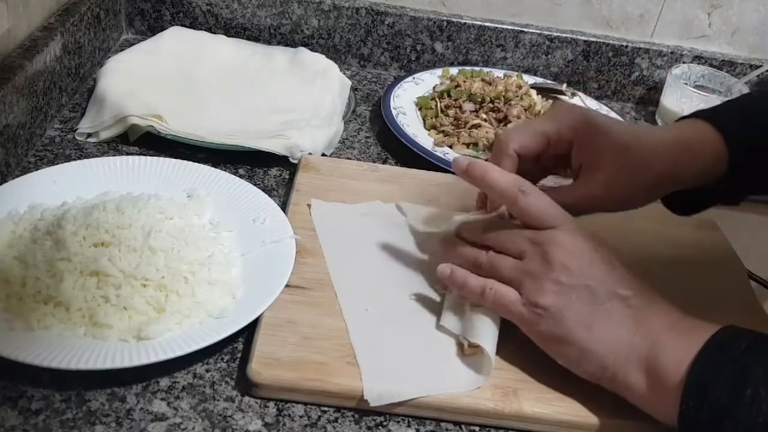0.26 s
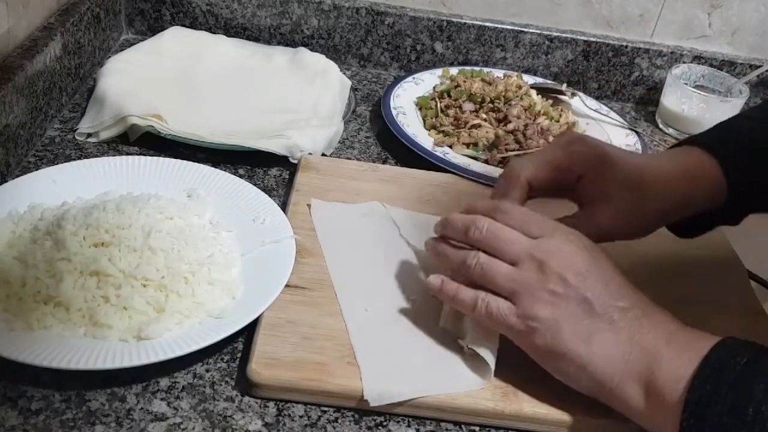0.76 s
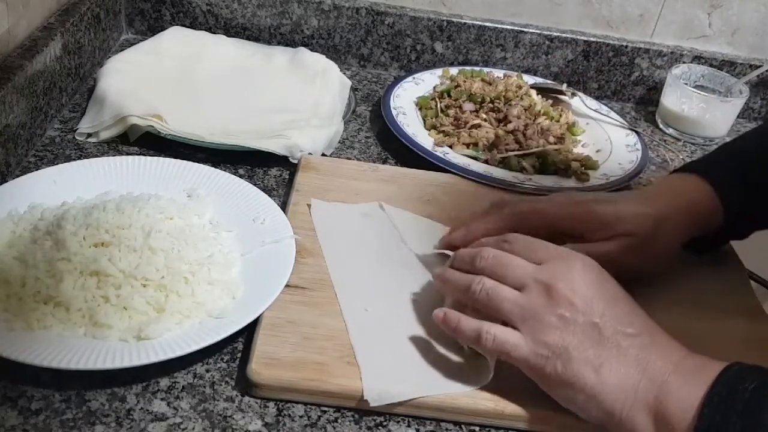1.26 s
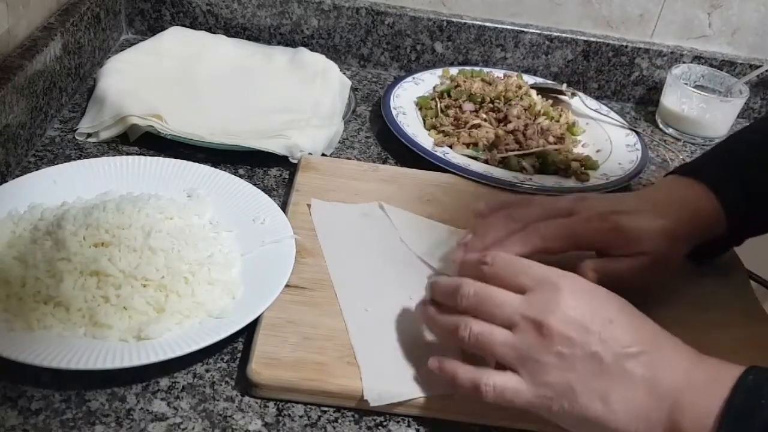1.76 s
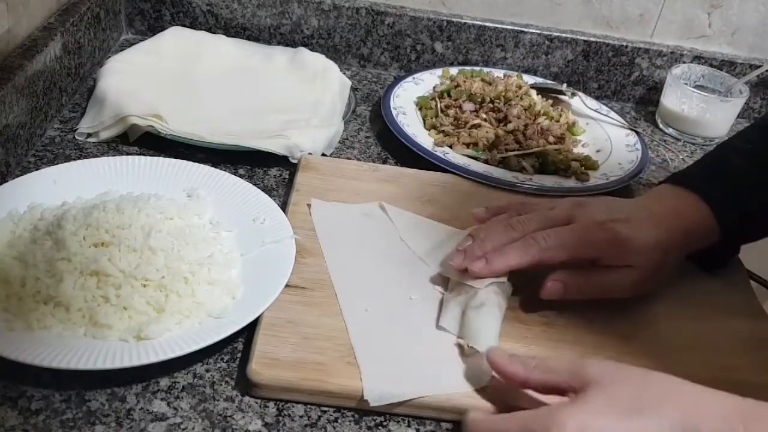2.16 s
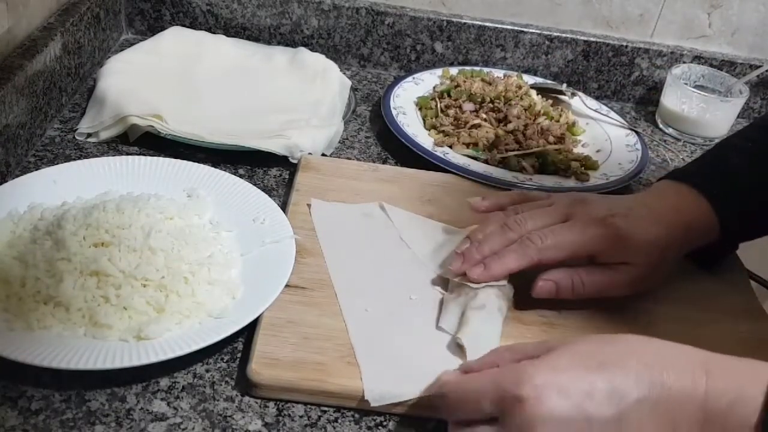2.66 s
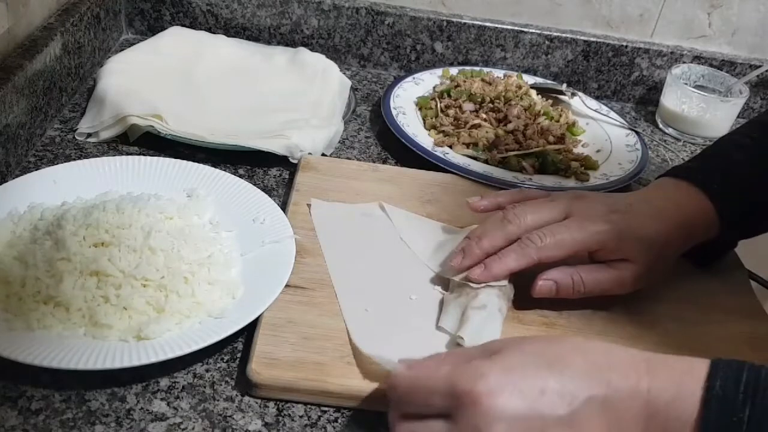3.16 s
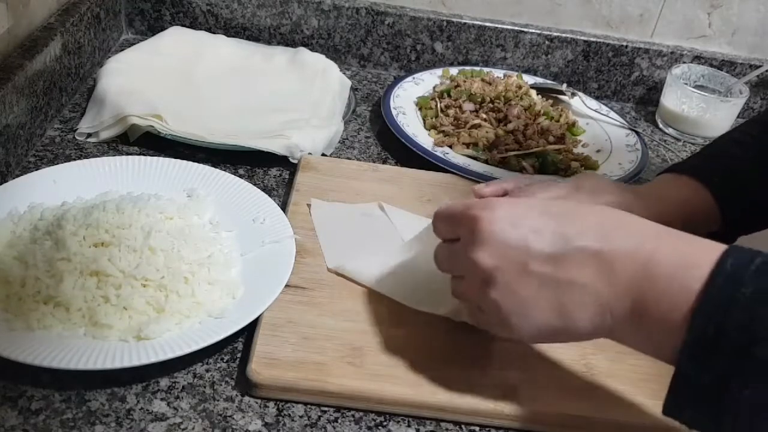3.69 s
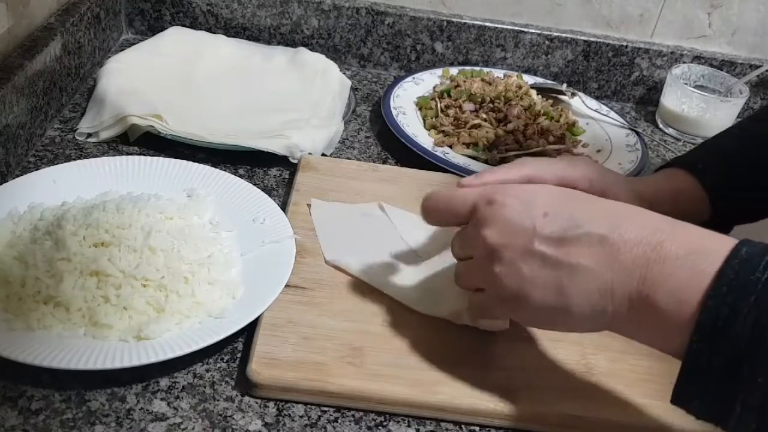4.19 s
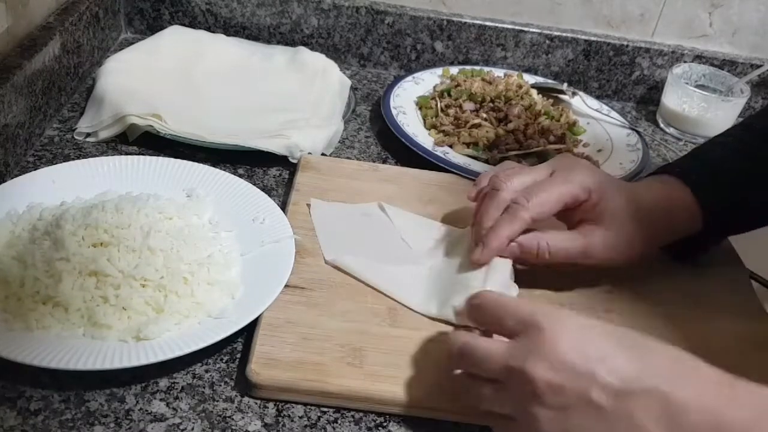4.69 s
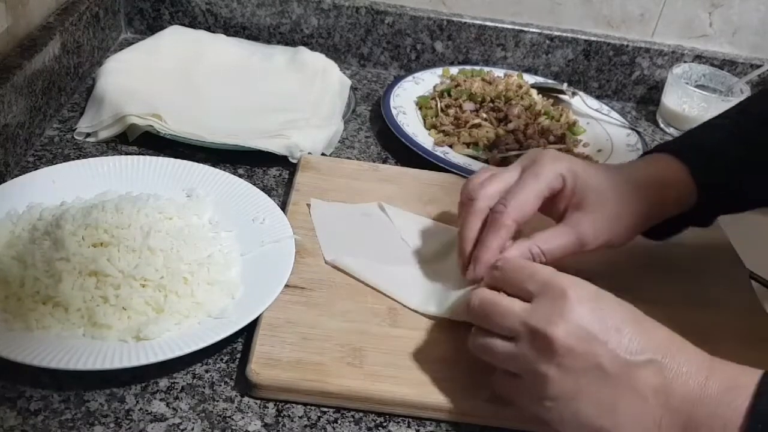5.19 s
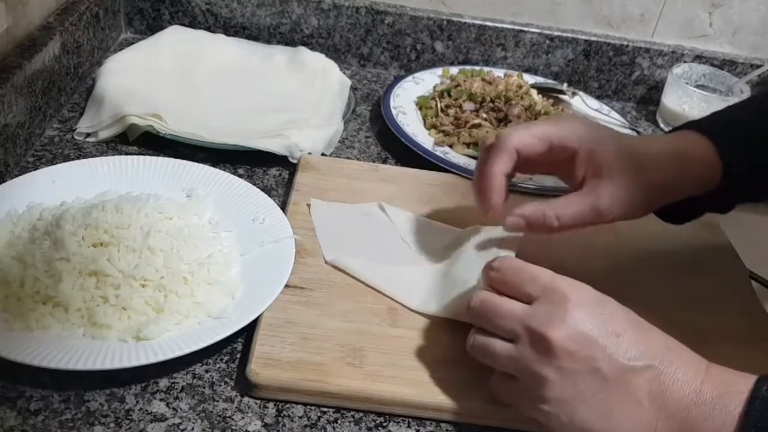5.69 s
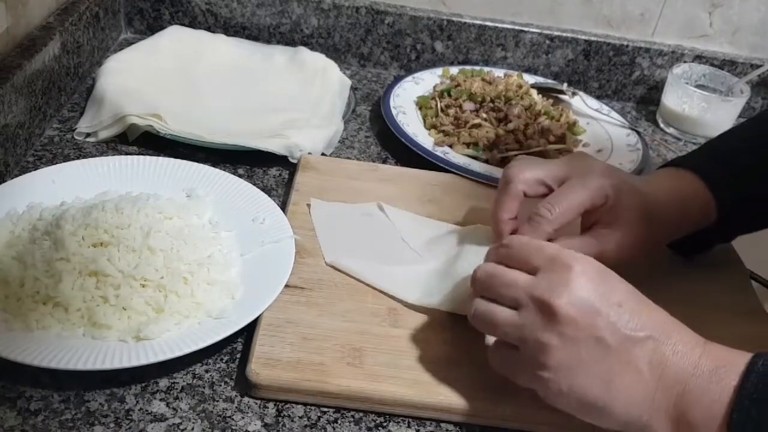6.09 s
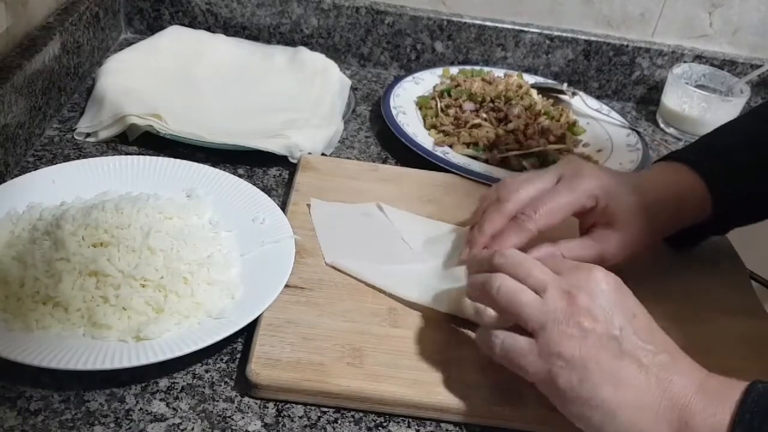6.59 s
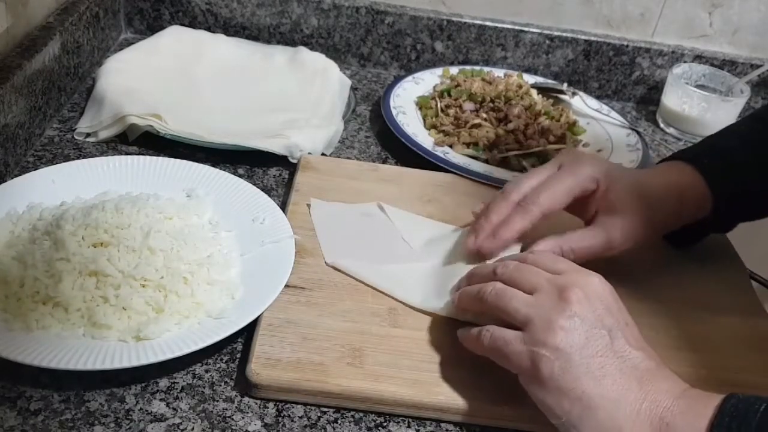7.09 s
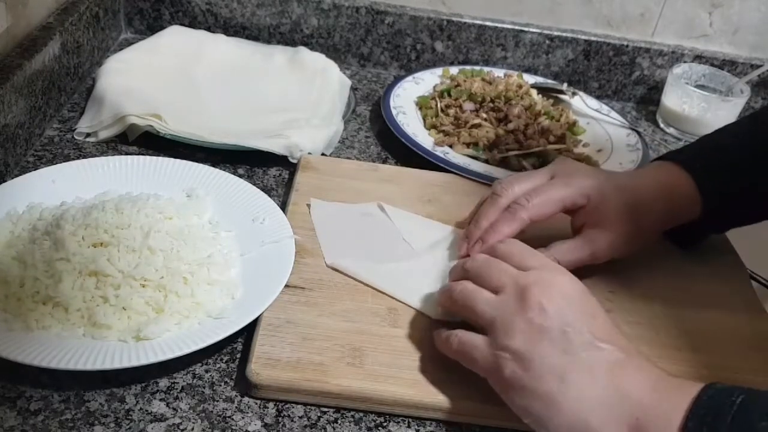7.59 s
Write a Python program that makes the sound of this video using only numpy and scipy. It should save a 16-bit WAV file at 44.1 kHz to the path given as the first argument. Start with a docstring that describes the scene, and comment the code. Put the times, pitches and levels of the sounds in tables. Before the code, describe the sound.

A kitchen fan hums and booms low and steadily with rushing air and a faint whine, one small sharp tick, and barely audible soft rubs.

```python
"""Kitchen fan and pastry sheet

A kitchen fan runs steadily: turbulent air booms in two low duct resonances, made of noise and wavering sines,
and rushes through the grille as shaped noise, over a mains hum and a faint motor whine made of drifting sines.
A thin noise hiss comes and goes. Hands fold a pastry sheet on a wooden board: a few soft rubs of grainy noise
and one small tick of decaying noise bursts.
"""
import sys
import numpy as np
from scipy import signal
from scipy.fft import rfft, irfft, next_fast_len
from scipy.io import wavfile
from scipy.ndimage import uniform_filter1d, map_coordinates

SR = 44100
rng = np.random.default_rng(int(sys.argv[2]) if len(sys.argv) > 2 else 0)


def materialize(psi):
    """Save the field psi as 16-bit PCM at rate SR to the path in sys.argv[1].

    A 1-D psi becomes a single channel; in a 2-D psi each row is a channel.
    """
    bounded = np.clip(np.atleast_2d(psi).T, -1, 1)
    quanta = np.round(bounded * 32767).astype(np.int16)
    wavfile.write(sys.argv[1], SR, quanta)


N = 346185


def amp(db):
    """Decibels to gain."""
    return 10 ** (np.asarray(db) / 20)


def unit(x):
    """Scale to rms 1."""
    return x / np.sqrt(np.mean(x ** 2) + 1e-20)


def wobble(rate):
    """A smooth random curve, rate knots a second."""
    knots = rng.standard_normal(int(N * rate / SR) + 4)
    return map_coordinates(knots, [np.arange(N) * rate / SR])


def noise(spectrum, peaks=(), ripple_db=0):
    """Noise of rms 1 with a (Hz, dB) spectrum, lifted at its resonances and rippled by wall reflections."""
    size = next_fast_len(N)
    hz = np.fft.rfftfreq(size, 1 / SR)
    f, level = np.transpose(spectrum)
    # straight lines over log frequency, next to nothing outside the table
    db = np.interp(np.log(hz + 1), np.log(f), level, left=-120, right=-120)
    for centre, width, lift in peaks:
        db = db + lift / (1 + (2 * (hz - centre) / width) ** 4)
    knots = 4 * np.sqrt(hz)  # the ripple widens towards the treble
    ripple = map_coordinates(rng.standard_normal(int(knots[-1]) + 2), [knots])
    db = db + ripple_db * ripple
    white = rfft(rng.standard_normal(size))
    return unit(irfft(white * amp(db), size)[:N])


def noise_pair(spectrum, peaks=(), ripple_db=0):
    """Independent noise for each ear, so the sound is diffuse."""
    return np.array([noise(spectrum, peaks, ripple_db) for _ in range(2)])


def panned(x, balance_db):
    """Two channels, the left louder by balance_db."""
    return x * amp([[balance_db / 2], [-balance_db / 2]])


def even(x, span):
    """Keep the flutter of a noise but level its swells longer than span seconds."""
    power = uniform_filter1d(x ** 2, max(int(span * SR), 1))
    return x / np.sqrt(np.abs(power) + 1e-9)


def swells(rows, rise_s, fall_s):
    """Gain of (start, length, dB, optional dB per s) events: each rises to its start, holds, then falls."""
    t = np.arange(N) / SR
    gain = np.zeros(N)
    for start, length, db, *growth in rows:
        rise = 1 + (t - start) / rise_s
        fall = 1 - (t - start - length) / fall_s
        gate = np.clip(np.minimum(rise, fall), 0, 1)
        level_db = db + sum(growth) * np.clip(t - start, 0, length)
        gain = np.maximum(gain, gate * amp(level_db))
    return gain


def lulls(rows, depth_db):
    """Gain that sinks briefly around each (centre, half width)."""
    t = np.arange(N) / SR
    dips = sum(np.exp(-((t - centre) / width) ** 2) for centre, width in rows)
    return amp(-depth_db * dips)


def resonance(spectrum, hz, louder, lull, louder_db, rest_db, waver_db, span, wander):
    """One duct resonance: a restless soft noise boom, with a wavering sine near its pitch in louder moments."""
    rest = amp(rest_db + waver_db * wobble(8)) * lull
    # the sine fades in ahead of each louder moment and fades out after it
    sine_gain = amp(louder_db + 1.07 * wobble(24)) * swells(louder, rise_s=0.038, fall_s=0.033)
    sine = np.sqrt(2) * np.sin(2 * np.pi * hz * np.cumsum(1 + wander * wobble(22)) / SR)
    share = sine_gain / np.hypot(rest, sine_gain)
    boom = rest * np.sqrt(1 - share ** 2 / 2) * even(noise(spectrum), span)  # softer under the sine
    return sine_gain * sine + boom


def duct():
    """Turbulence rumbles and booms in two low resonances, each with louder moments and lulls of its own."""
    # Soft boom of each resonance. Each row: frequency in Hz, relative level in dB per Hz.
    lower_colour = [(57, -42), (64, 0.5), (68.5, 4), (73, -0.5), (80, 2), (86, -2), (94, -40)]
    upper_colour = [(124, -23), (129, -6), (134, -1), (139, -7), (148, -35)]
    # Steady rumble under the resonances. Each row: frequency in Hz, relative level in dB per Hz.
    rumble_colour = [(20, -29), (35, -10), (44, -13.5), (58, -8), (75, -3.5), (95, -6), (108, 1),
                     (120, -6.5), (146, 3), (165, -4.5), (195, -10.5), (215, -9.5), (250, -21.5)]
    # Chance louder moments of each boom, some strong, some faint.
    # Each row: start in seconds, length in seconds, relative level in dB.
    lower_louder = [(0.042, 0.046, -33), (0.436, 0.052, -30), (0.57, .03, -35.5), (.775, 0.097, -33),
                    (.95, .05, -38), (1.127, 0.033, -32.5), (1.35, .03, -32), (1.566, 0.027, -37),
                    (1.885, 0.025, -31.5), (2.013, 0.041, -30), (2.21, 0.028, -33), (2.385, 0.031, -30.5),
                    (2.53, 0.035, -28), (2.74, 0.098, -32), (2.962, 0.04, -32), (3.197, .05, -38),
                    (3.33, 0.082, -37), (3.474, 0.04, -31), (3.99, 0.033, -32.5), (4.246, 0.06, -30.5),
                    (4.54, 0.047, -31), (4.633, 0.036, -32.5), (5, 0.045, -30), (5.15, 0.025, -32),
                    (5.26, 0.036, -33), (5.958, 0.035, -33), (6.72, 0.048, -32), (6.967, 0.028, -33),
                    (7.34, .07, -35.5), (7.584, 0.04, -31.5), (7.766, 0.052, -31)]
    upper_louder = [(0.09, 0.039, -29.5), (0.202, 0.16, -33), (0.546, 0.041, -33.5), (0.752, 0.1, -31),
                    (0.872, 0.18, -29), (1.318, 0.12, -32.5), (1.625, 0.16, -32.5), (1.93, 0.1, -28.5),
                    (2.401, 0.077, -31.5), (2.85, 0.046, -32), (2.953, 0.035, -29.5), (3.138, 0.038, -30.5),
                    (3.257, 0.035, -34), (3.49, 0.2, -31.5), (3.74, 0.047, -29), (4.392, .05, -31.5),
                    (5.252, 0.15, -33), (5.468, 0.1, -29), (5.831, .12, -34), (6.086, 0.028, -39),
                    (6.313, 0.15, -29), (6.677, 0.066, -28), (7.09, 0.036, -31.5), (7.57, 0.055, -32)]
    # Brief lulls of the lower boom, then of the upper boom and the rumble.
    # Each row: centre in seconds, half width in seconds.
    lower_lulls = [(.25, 0.076), (1.82, 0.037), (2.65, .05), (3.72, 0.054), (4.12, 0.072), (4.46, .05),
                   (4.89, 0.075), (5.5, 0.063), (6.15, .05), (6.49, .06), (7.69, 0.024)]
    upper_lulls = [(.666, 0.029), (1.27, 0.037), (1.863, 0.033), (2.11, 0.052), (2.602, 0.022), (2.7, .025),
                   (3.1, .025), (4.62, 0.025), (4.76, 0.032), (5.08, 0.047), (6.87, .09), (7.44, 0.025),
                   (7.7, 0.031)]

    lower_lull = lulls(lower_lulls, depth_db=8)
    upper_lull = lulls(upper_lulls, depth_db=5)
    lower = resonance(lower_colour, 71.23, lower_louder, lower_lull, louder_db=-2.2,
                      rest_db=-39.5, waver_db=1.0, span=0.08, wander=0.0446)
    upper = resonance(upper_colour, 133.76, upper_louder, upper_lull, louder_db=-1.87,
                      rest_db=-41, waver_db=1.5, span=0.11, wander=0.009)
    # the square root halves the lull's depth in dB
    rumble = amp(-38.0) * np.sqrt(upper_lull) * even(noise(rumble_colour), span=0.15)
    return panned(lower, balance_db=0.5) + panned(upper, balance_db=2.5) + panned(rumble, balance_db=1.0)


def air():
    """The rush through the grille, coloured by housing and room, a little unsteady."""
    # Rushing air, the part common to both ears and the part that differs.
    # Each row: frequency in Hz, relative level in dB per Hz.
    mid_colour = [(140, -47), (230, -6), (294, 0.5), (357, -3.5), (426, -3), (465, -10), (491, -5),
                  (628, -8), (674, -4), (736, -7), (1140, -8.5), (1870, -16.5), (2230, -15.5),
                  (3530, -26.5), (15500, -43)]
    side_colour = [(59, -46), (100, -16), (134, -12), (173, -9), (196, -9.5), (258, -11.5), (403, -10),
                   (467, -23), (640, -12), (682, -7), (742, -13.5), (1180, -11), (1280, -12), (4370, -33.5),
                   (15500, -47)]
    # Resonances of housing and room in each part. Each row: centre in Hz, width in Hz, lift in dB.
    mid_peaks = [(281, 10.6, 5.5), (312.5, 21, 3.5), (438, 42, 3.5), (511.4, 14, 7), (557.4, 53, 6.5),
                 (673.7, 13, 5.5), (818, 20, 2), (956, 113, 3), (1116, 16, 5.5), (1167, 40, 5),
                 (1271, 28, 5.5), (1437, 37, 2.5), (1505, 300, 3.5), (1647, 44, 5.5), (2150, 170, 0),
                 (2757, 65, 4), (3920, 350, 2.5), (8200, 750, 3)]
    side_peaks = [(235, 27, 4.4), (412, 43, 5.3), (1036, 40, 4.6), (1153, 42, 7.1), (1350, 110, 4.9),
                  (1620, 70, 5.6), (2200, 90, 3), (2750, 120, 1.8)]

    ripple_db = 0.9
    mid = amp(-47.5) * noise(mid_colour, mid_peaks, ripple_db)
    side = amp(-48.0) * noise(side_colour, side_peaks, ripple_db)
    flow_db = 0.44 * wobble(8.2)
    return amp(flow_db) * np.array([mid + side, mid - side])


def tone(hz, level_db, balance_db, lead, drift):
    """A sine on the shaft's drifting clock, placed between the ears by level and phase."""
    clock = np.arange(N) / SR + drift
    phase = 2 * np.pi * hz * clock + np.array([[lead / 2], [-lead / 2]])
    return panned(np.sqrt(2) * amp(level_db) * np.sin(phase), balance_db)


def motor(flutter_db=1.3):
    """Mains hum and rotor tones waver slightly; the whine flutters above the hum and sags now and then."""
    # Hum and rotor tones. Each row: frequency in Hz, level in dB, left-right balance in dB,
    # phase lead of the left in radians, waver scale in dB.
    tones = [(99.1, -47.5, 3, -0.073, -0.5), (203.5, -44, 6, -0.05, 1.5), (391.2, -67.5, 18, -1.5, 1.5),
             (498.6, -72, 0, 0, 0), (1111, -73, 9, -1.1, 3), (2758, -78, -5, -.5, 1)]
    # Sags of the whine. Each row: centre in seconds, half width in seconds, depth in dB.
    whine_sags = [(2.48, 0.39, 2.5), (4.1, 0.86, 3)]

    whine_hz, whine_db = 693, -54
    drift = 0.00085 * np.cumsum(wobble(3)) / SR  # the shaft speed wanders a little
    t = np.arange(N) / SR
    sag_db = sum(depth_db * np.exp(-((t - centre) / width) ** 2) for centre, width, depth_db in whine_sags)
    whine_level_db = whine_db - sag_db + flutter_db * wobble(12)
    whine_drift = drift + 0.00004 * wobble(9)
    out = tone(whine_hz, whine_level_db, balance_db=-1.5, lead=1.04, drift=whine_drift)
    for hz, db, balance_db, lead, waver_db in tones:
        out += tone(hz, db + waver_db * wobble(5), balance_db, lead, drift)
    return out


def hiss(flutter_db=1.1):
    """A thin diffuse hiss in fluttering spells over a faint bed; its top rises and falls on its own."""
    # Spells of hiss. Each row: start in seconds, length in seconds, level in dB, growth in dB per second.
    spells = [(.03, 0.025, -61.5, 0), (.335, .015, -70, 0), (.9, .05, -68.5, 0), (1.96, 0.073, -61.5, 0),
              (2.26, 1.12, -62.5, 1.5), (6.01, 2.3, -63.5, -0.5)]
    # Colour of the hiss. Each row: frequency in Hz, relative level in dB per Hz.
    colour = [(2500, -11), (4000, -2), (6000, -4.5), (7000, -1.5), (8400, 1), (10500, -3.5), (13000, -5.5),
              (15700, -12)]
    # Its resonances. Each row: centre in Hz, width in Hz, lift in dB.
    peaks = [(5190, 240, 8), (6870, 350, 3), (7900, 990, 1), (10600, 300, 1.5)]
    # Lift of the hiss above the split. Each row: time in seconds, lift in dB.
    top_lift = [(2.3, 0), (3.1, -1), (3.35, 1.5), (6.0, -0.5), (7.8, 2.5)]

    split_hz, rest_db = 10200, -72.5
    gain = np.hypot(amp(rest_db), swells(spells, rise_s=0.04, fall_s=0.08))
    pair = noise_pair(colour, peaks, ripple_db=1.8)
    top_filter = signal.butter(4, split_hz, "high", fs=SR, output="sos")
    top = signal.sosfiltfilt(top_filter, pair)
    top_db = np.interp(np.arange(N) / SR, *np.transpose(top_lift))
    body = (pair - top) * amp(flutter_db * wobble(25))
    return gain * (body + top * amp(top_db + flutter_db * wobble(25)))


def pastry(grain_db=4.5):
    """Fingers brush the sheet: tiny slips of uneven size, faint all along and stronger in a few rubs."""
    # Fingers rubbing the sheet. Each row: start in seconds, length in seconds, level in dB.
    rubs = [(1.5, .05, -65.5), (1.94, .04, -66), (2.85, .3, -69), (3.19, .035, -61), (3.32, .035, -63),
            (5.35, .1, -70)]
    # Colour of the rubbing. Each row: frequency in Hz, relative level in dB per Hz.
    colour = [(1500, -8), (2700, 3), (4000, -4), (6000, -8), (9000, -13), (15500, -18)]

    rest_db = -79  # faint handling in between
    gain = np.hypot(amp(rest_db), swells(rubs, rise_s=0.02, fall_s=0.05))
    slips = unit(amp(grain_db * wobble(300)))
    return gain * slips * noise_pair(colour)


def burst(age, db, t60, rise_s):
    """Gain of a sharp onset that falls by 60 dB in t60 seconds."""
    return amp(db - 60 * age / t60) * (1 - np.exp(-age / rise_s))


def tick(crack_db=-45.0, crack_t60=0.008, snap_db=-43.0, snap_t60=0.05, room_db=-47.5, room_t60=0.22):
    """A dry crack and bright snap, a little to the right, then a wall's answer and the kitchen's duller tail."""
    # Colours of crack and wall answer, of snap, and of room tail.
    # Each row: frequency in Hz, relative level in dB per Hz.
    crack_colour = [(1800, -8), (3000, 0), (5500, -2), (6800, -6), (8200, 3), (9100, -8), (10300, 0),
                    (11600, -2), (12500, -11), (15500, -21)]
    snap_colour = [(1200, -22), (2000, -11), (2400, 2), (3300, 2), (4100, -9), (6100, -6), (6800, -15),
                   (7500, -11), (8200, -3), (9100, -19), (10200, -12), (11500, -15), (12400, -20),
                   (15000, -30)]
    tail_colour = [(1200, -14), (2000, -8), (2450, 2), (3200, 8), (4200, -3), (6000, -11), (9000, -10),
                   (15000, -26)]

    tick_s = 1.1877
    echo_s, echo_db = 0.014, -11  # delay, level relative to the snap
    age = np.maximum(np.arange(N) / SR - tick_s, 0)
    echo_age = np.maximum(age - echo_s, 0)
    crack = burst(age, crack_db, crack_t60, rise_s=0.0003) * noise_pair(crack_colour)
    snap = burst(age, snap_db, snap_t60, rise_s=0.00054) * noise_pair(snap_colour)
    echo = burst(echo_age, snap_db + echo_db, snap_t60, rise_s=0.0006) * noise_pair(crack_colour)
    tail = burst(age, room_db, room_t60, rise_s=0.0034) * noise_pair(tail_colour)
    return panned(crack + snap, balance_db=-4.0) + echo + tail


def scene():
    """Fan, hiss and hands together."""
    return duct() + air() + motor() + hiss() + pastry() + tick()


def record(dry):
    """Everything above a sharp band limit is cut off."""
    top_hz = 15700
    size = next_fast_len(N + SR // 2)
    kept = np.fft.rfftfreq(size, 1 / SR) < top_hz
    return irfft(rfft(dry, size) * kept, size)[:, :N]


dry = scene()
out = record(dry)
materialize(out)
```